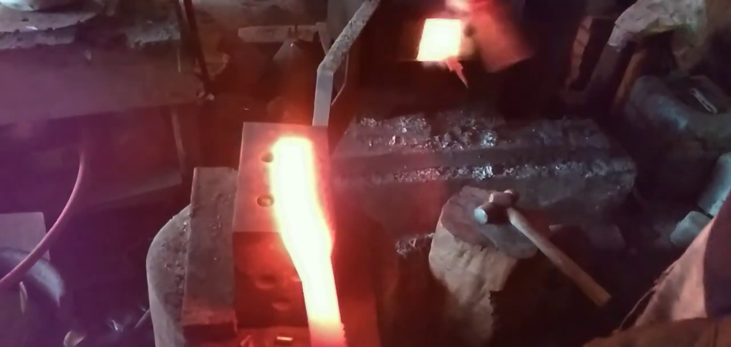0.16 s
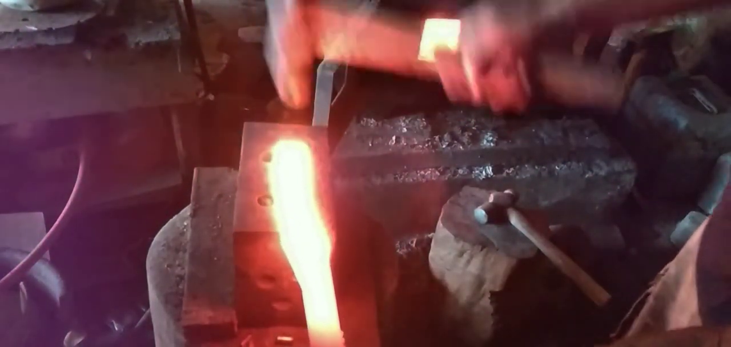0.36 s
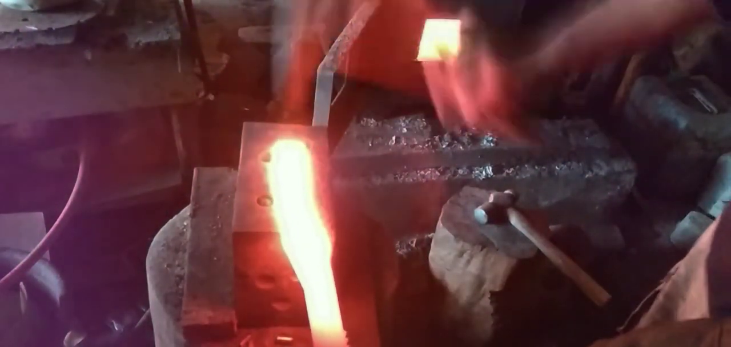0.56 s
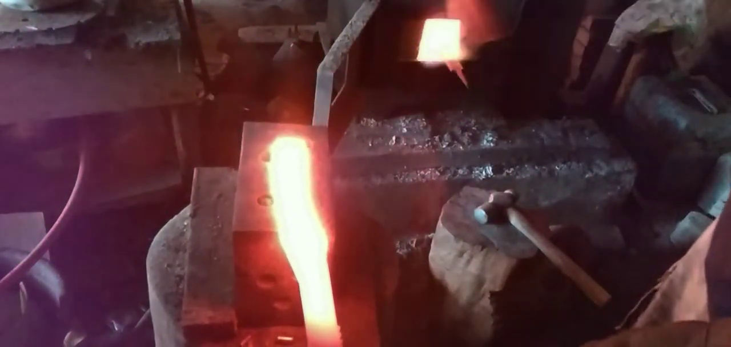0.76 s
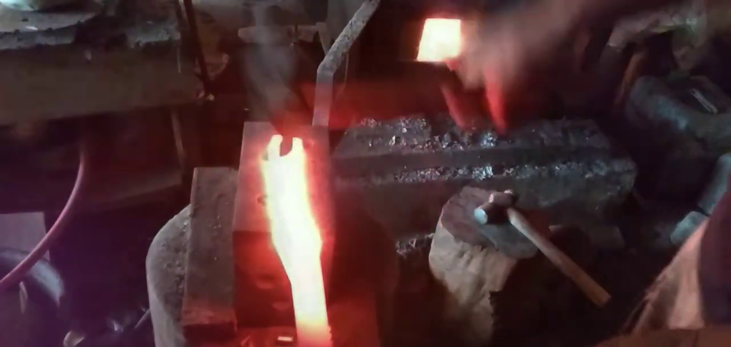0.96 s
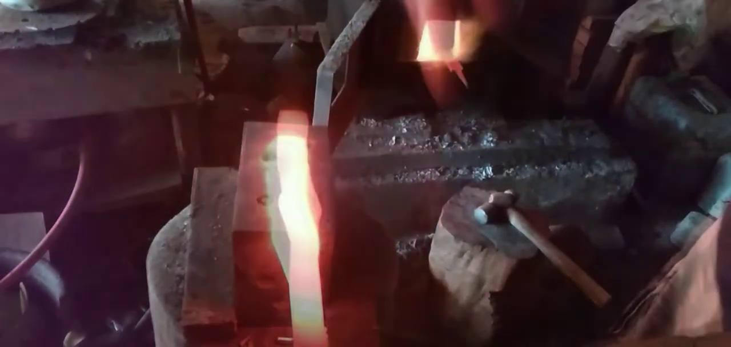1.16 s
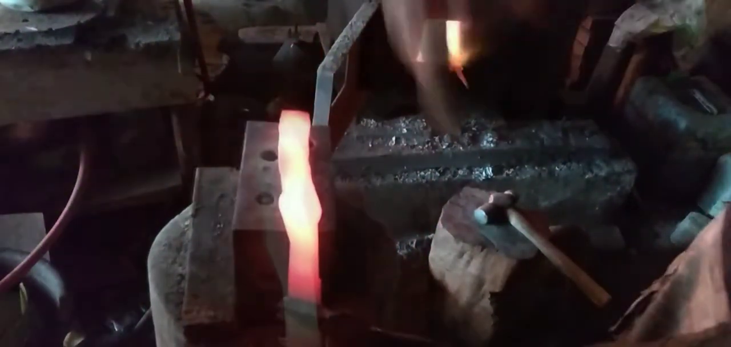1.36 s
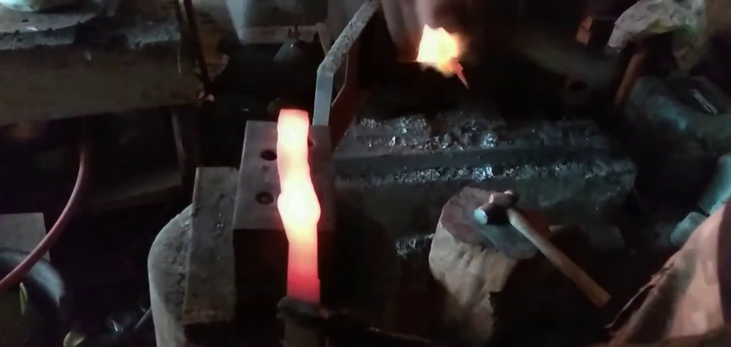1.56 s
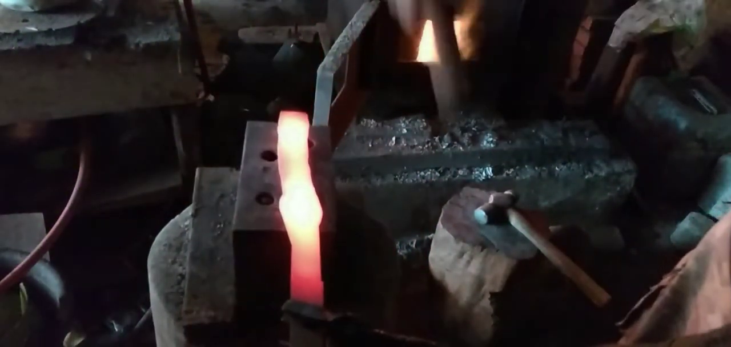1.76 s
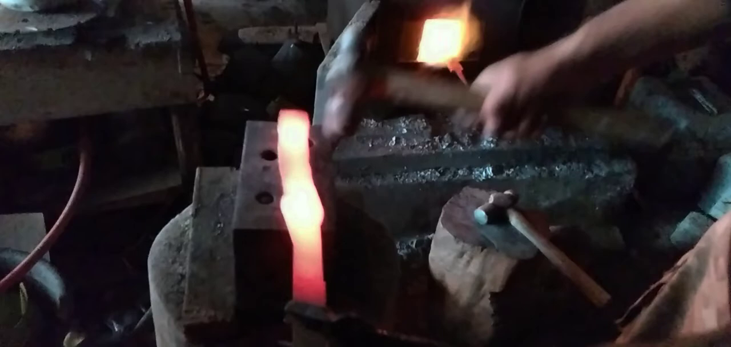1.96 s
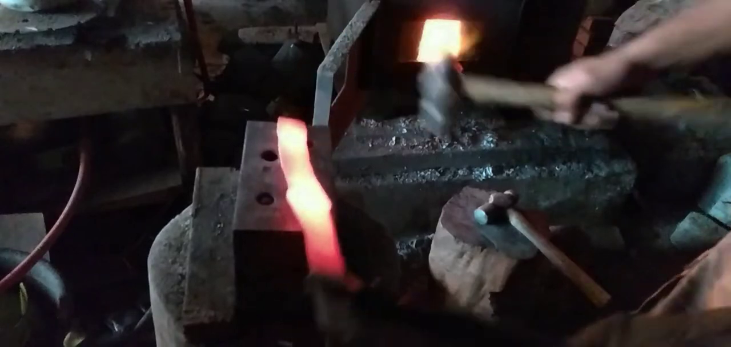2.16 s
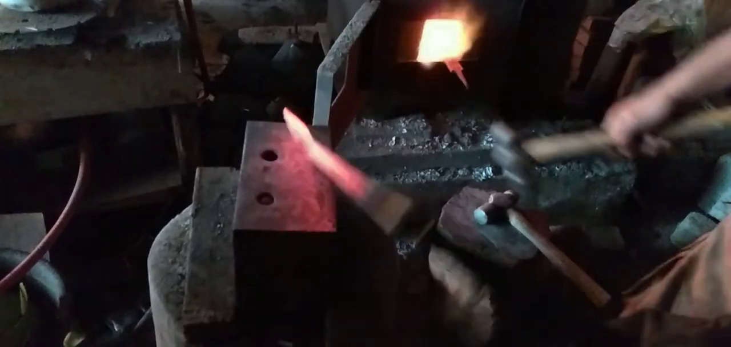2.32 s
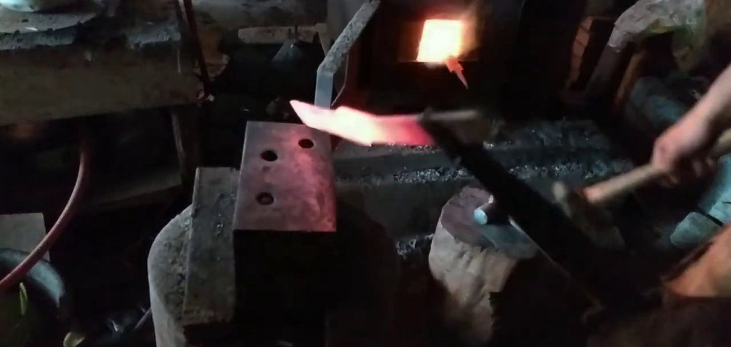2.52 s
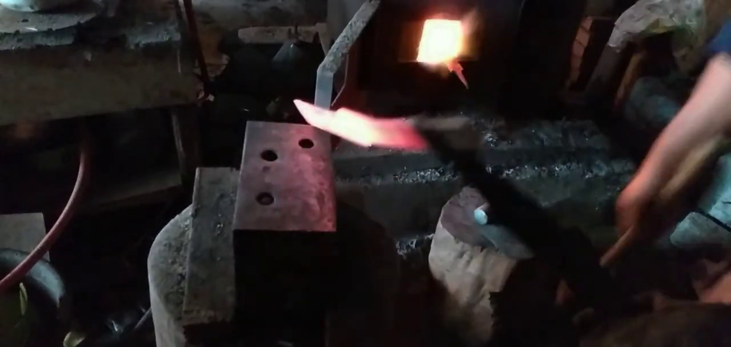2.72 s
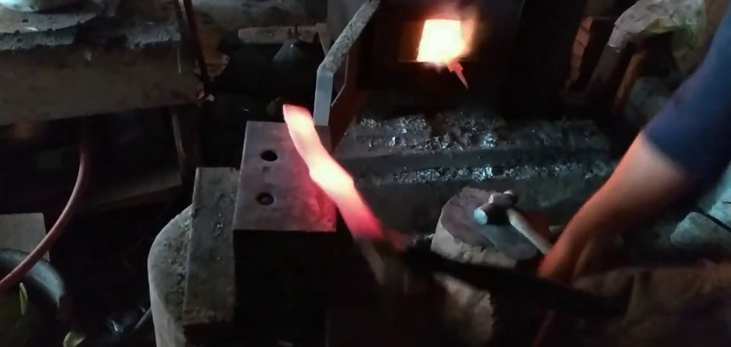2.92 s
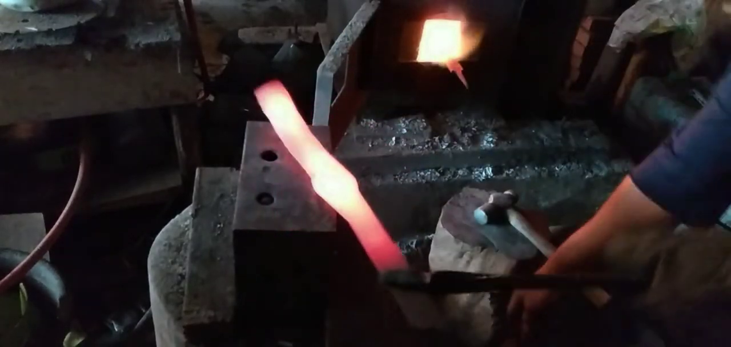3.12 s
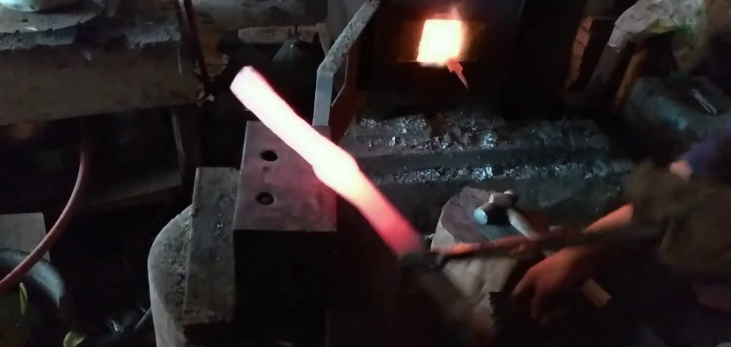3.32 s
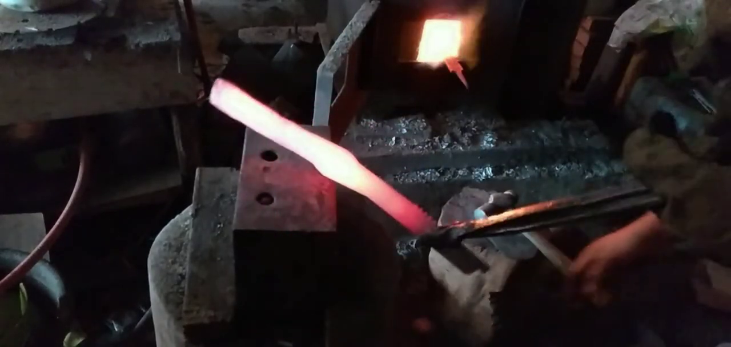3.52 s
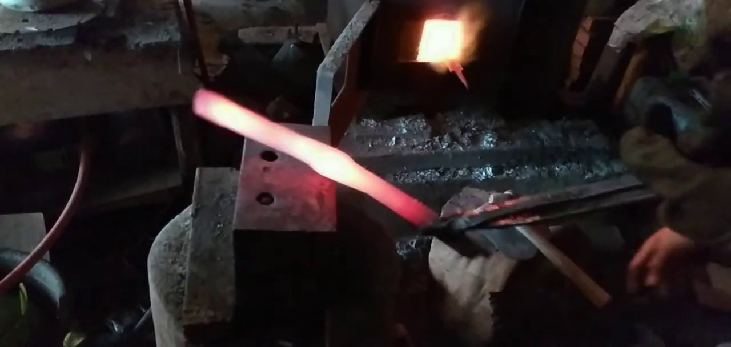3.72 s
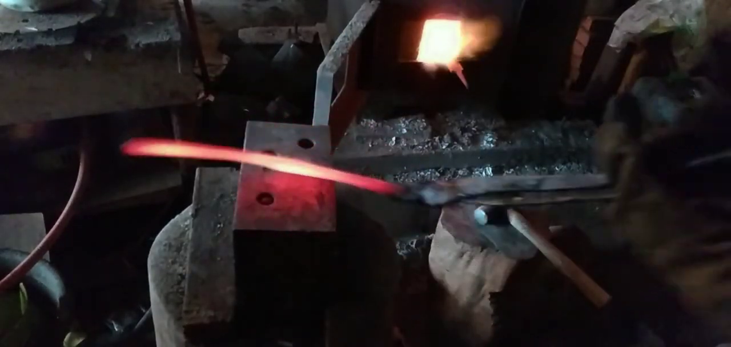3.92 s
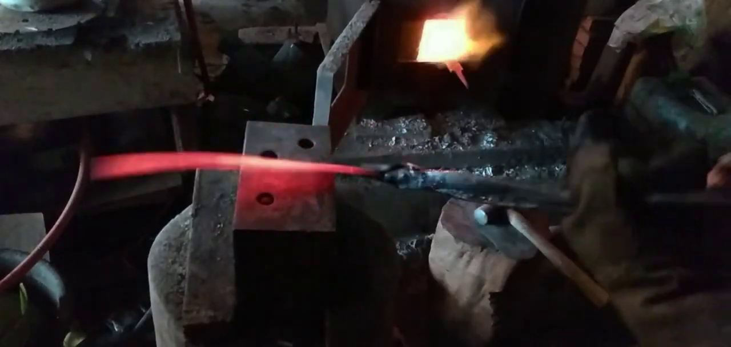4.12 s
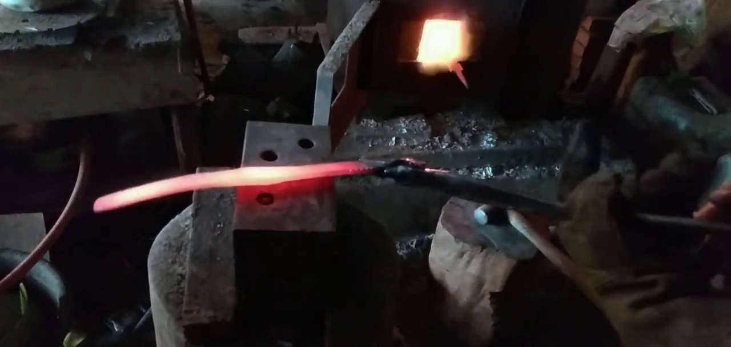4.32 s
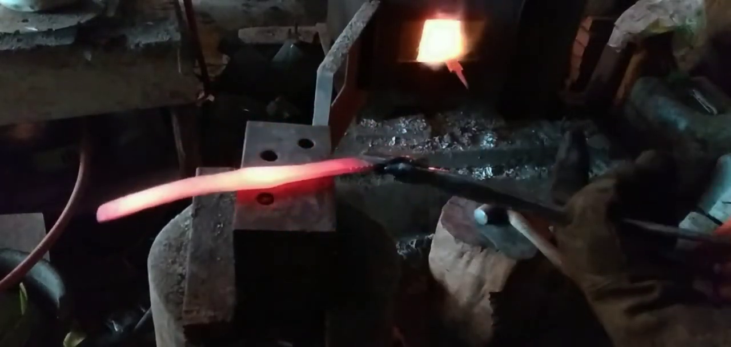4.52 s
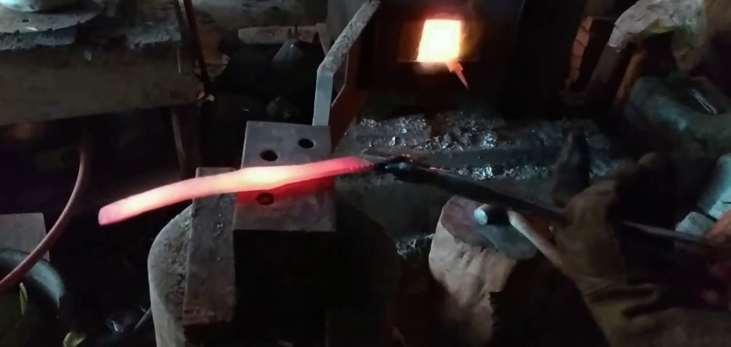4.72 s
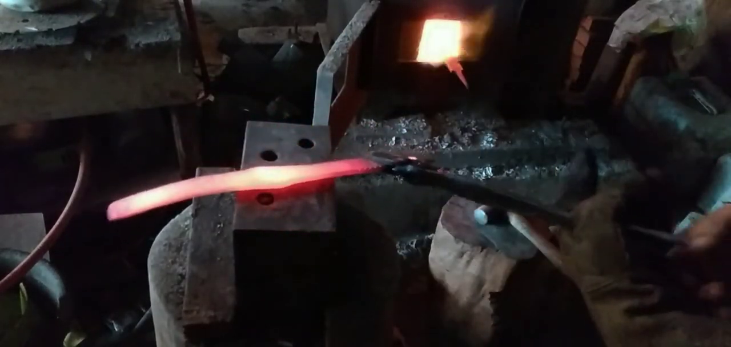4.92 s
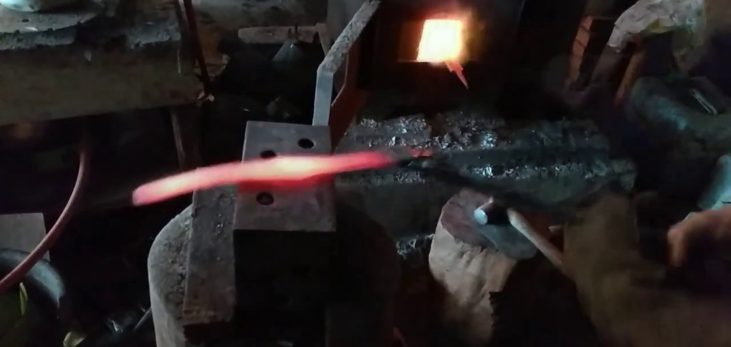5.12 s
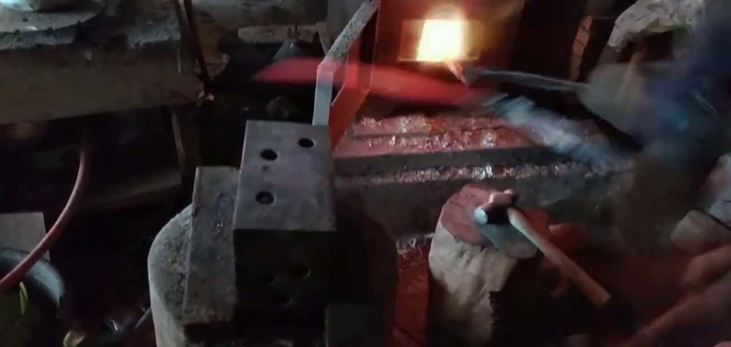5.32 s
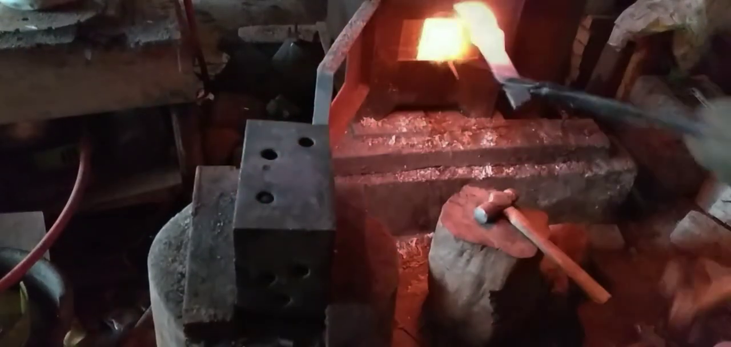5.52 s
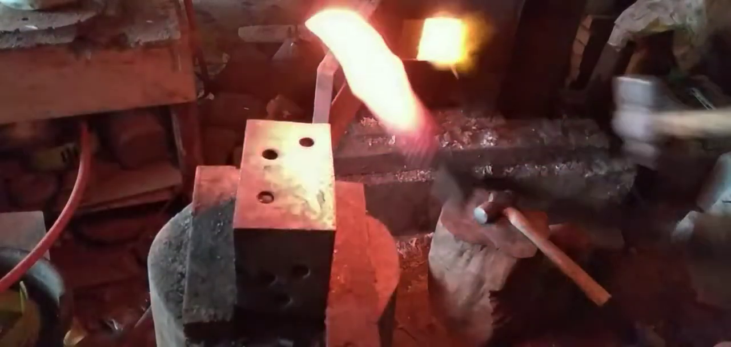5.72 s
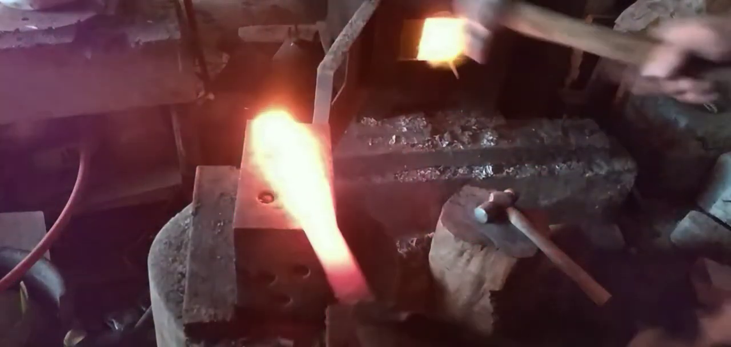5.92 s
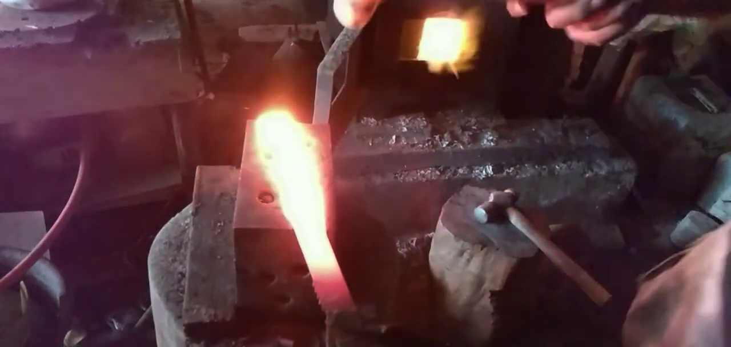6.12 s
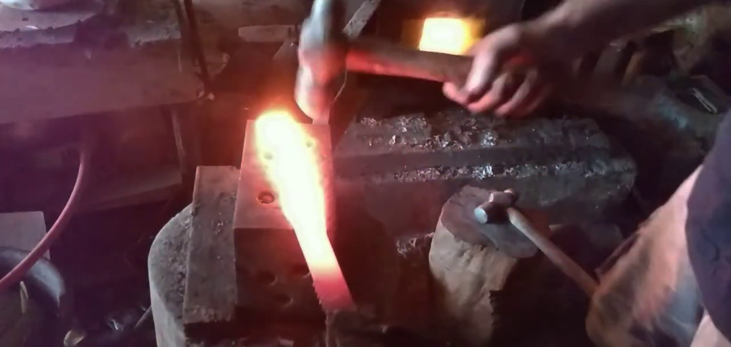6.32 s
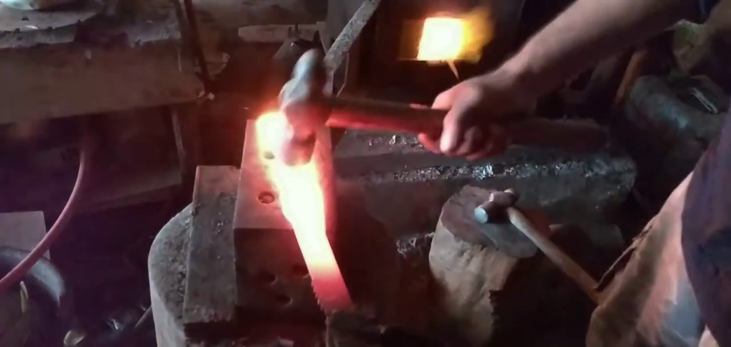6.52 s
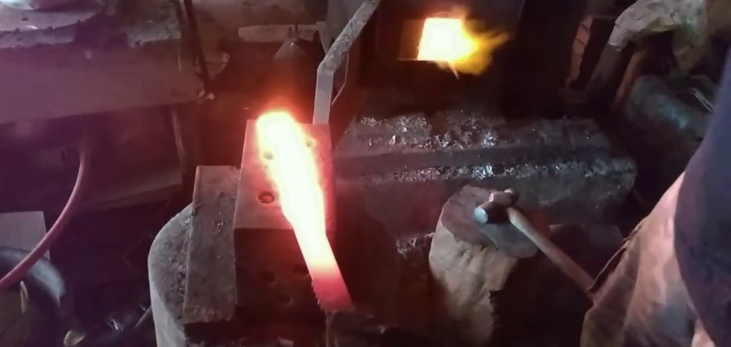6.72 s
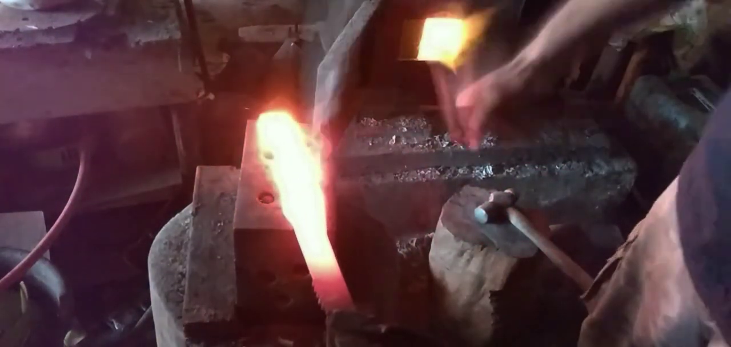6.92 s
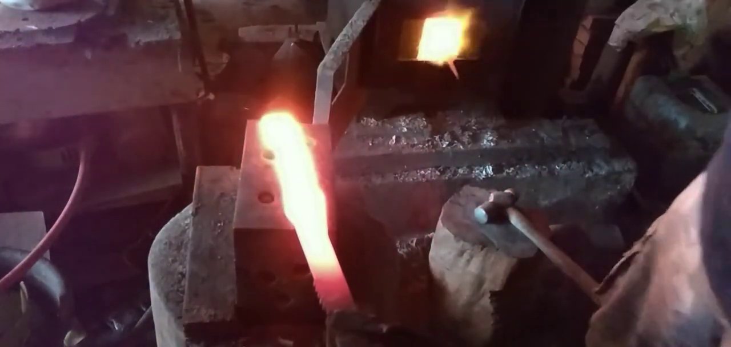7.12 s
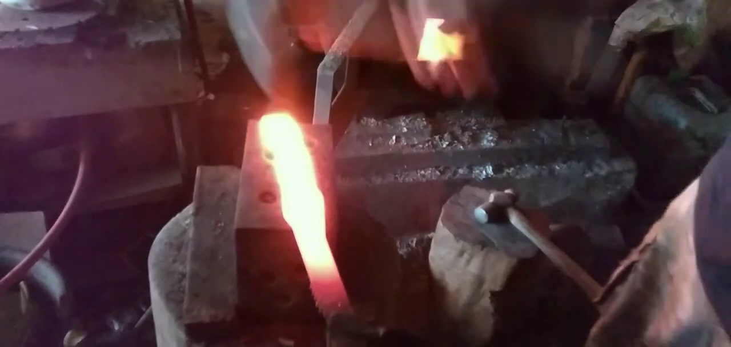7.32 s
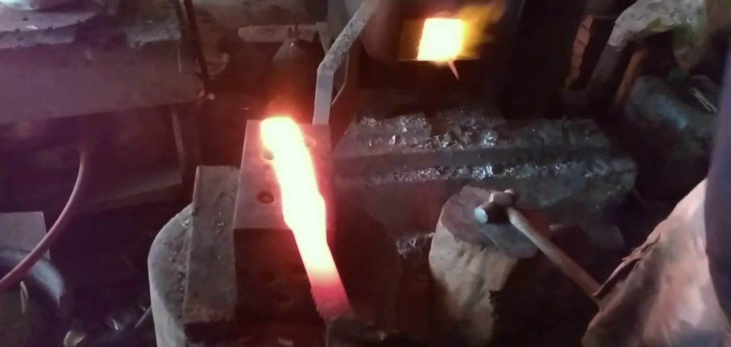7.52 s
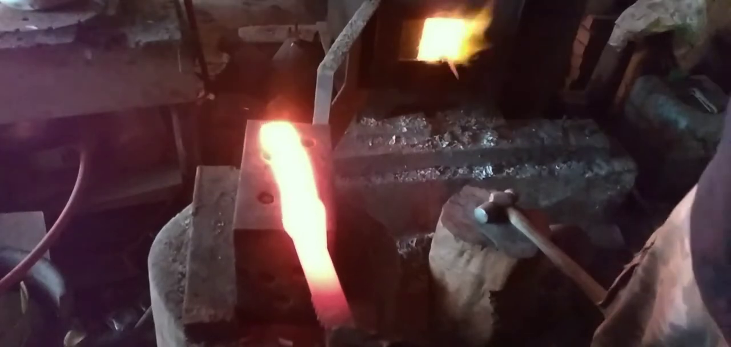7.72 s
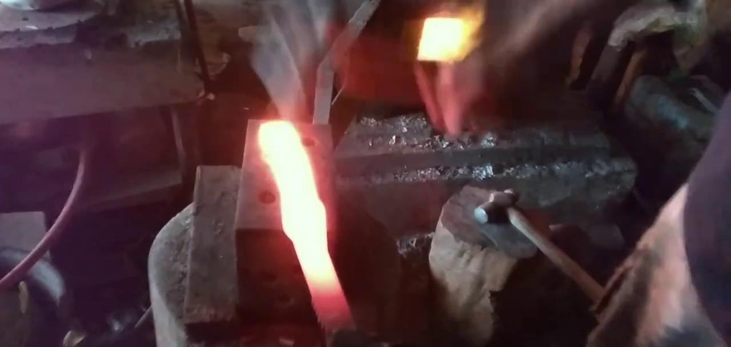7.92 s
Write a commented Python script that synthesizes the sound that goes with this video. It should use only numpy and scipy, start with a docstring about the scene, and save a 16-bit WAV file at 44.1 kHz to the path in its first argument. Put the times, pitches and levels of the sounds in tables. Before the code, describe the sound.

In a small cluttered workshop, a hammer strikes hot steel on an anvil about three times a second. Each blow is a hard, bright, short clang with a low thump, distorting the close microphones. Around two seconds it stops; tongs clink and scrape faintly over the forge's low roar and hiss. A sharp dead tap then leads into another run of blows.

```python
"""A smith hammers a red-hot bar on an anvil: a run of blows, a pause to turn the bar with tongs, then a second run.
Each blow is shaped noise for the clang and fading sine tones for the ringing steel, with a low thump under it
as the close microphones overload; peaks beyond full scale are cut flat.
The small workshop answers with a brief noise tail.
Behind it all the forge drones, whines and hisses as filtered noise; a few faint chirps are narrow noise."""
import sys
import numpy as np
from scipy import signal
from scipy.fft import rfft, irfft, next_fast_len
from scipy.io import wavfile
from scipy.ndimage import map_coordinates

SR = 44100
rng = np.random.default_rng(int(sys.argv[2]) if len(sys.argv) > 2 else 0)


def store_wav(level_fs):
    """Save 16-bit WAV to argv[1]."""
    pcm = np.round(np.clip(np.atleast_2d(level_fs), -1, 1) * 32767)
    wavfile.write(sys.argv[1], SR, pcm.T.astype(np.int16))


N = 355446  # samples, about 8 s

# hammer contacts; the weak ones just after a blow are the hammer dropping back.
# Where it lands decides which modes ring:
# [t/s, clang level/dB, rise/s, chatter/s, t60/s, crack against clang/dB, brightness/(dB per octave),
#  ring level/dB of each family: ping, face, edge, heel, bar low, bar high]
BLOWS = [(-0.095, 9, .001, 0.006, 0.13, 3.5, -6, -16, -7.5, -32, -28, -18, -18),
         (0.2148, -17, 0.00016, .001, 0.22, 20.5, -2.1, -35, -15, -27, -29, -19, -10),
         (0.5240, -6.5, 0.00012, 0.0057, 0.11, 6.5, 0.2, -24, -18, -25, -40, -38, -5.5),
         (0.8265, -10.5, 0.0028, 0.01, 0.16, 6, -.6, -22, -15, -38, -31, -5, -20),
         (0.9125, -25, .00015, .003, 0.33, 9.5, -1.5, -33, -28, -31, -38, -29, -20),
         (1.145, -17, 0.011, 0.022, 0.18, 10, -1.1, -14.5, -13.5, -42, -20, -16, -12),
         (1.341, -10, 0.0004, 0.0028, 0.29, 0, -0.4, -16, -30, -26, -32, -23, -18),
         (1.464, -22.5, 0.00036, 0.0053, 0.13, 12.5, -1.2, -16, -19, -30, -30, -41, -19),
         (1.7599, -9, 0.00012, 0.0041, 0.25, 5, -0.6, -15.5, -10, -18, -25, -7.5, -8),
         (6.8631, -4.5, 0.000097, 0.0067, 0.13, -8, 0.9, -14, -24, -23, -36, -14, -22),
         (7.1904, -7, 0.00097, 0.011, 0.17, 9.5, -1, -20, -10.5, -32, -14, -5, -8),
         (7.5257, -9.5, 0.0017, 0.02, 0.11, 3, -0.9, -9.5, -28, -15.5, -24, -18, -2.5),
         (7.582, -20, 0.0026, 0.0059, 0.057, 14, 3.5, -47, -43, -44, -44, -39, -36),
         (7.827, -8, 0.019, 0.027, 0.14, 8, -0.5, -12, -20, -10.5, -10, -6, -23)]
# colour of steel striking steel: [f/Hz, relative level/dB per Hz]
CLANG_COLOUR = [(60, -4), (400, -10), (900, -12), (2000, -8.5), (3100, -10), (4100, -6.5), (5000, -8),
                (6100, -2), (6800, 1), (8000, -3), (10500, 1.5), (12500, -2), (14000, -5.5), (14800, -2.5),
                (15500, -18)]
# where the clang sits between the microphones: [f/Hz, left minus right/dB]
CLANG_BALANCE = [(1000, 0.5), (3000, -0.5), (6300, 4.5), (7500, 14), (8700, -10), (10200, -13),
                 (12000, -10), (15000, -1)]


def amp(db):
    """Decibels to gain."""
    return 10 ** (np.asarray(db) / 20)


def unit(x):
    """Scale x to an rms of 1."""
    return x / np.sqrt(np.mean(x ** 2) + 1e-20)


def along(points, hz):
    """Read a table of (f/Hz, value) at any frequency, on a log axis."""
    f, value = np.transpose(points)
    return np.interp(np.log(hz + 1), np.log(f + 1), value)


def curve(rows):
    """Turn a table of (t/s, value) into one value per sample."""
    return np.interp(np.arange(N) / SR, *np.transpose(rows))


def wobble(rate, size):
    """A smooth random curve through `rate` random points a second."""
    knots = rng.standard_normal(int(size * rate / SR) + 4)
    return map_coordinates(knots, [np.arange(size) * rate / SR])


def filtered(x, response):
    """Multiply the spectrum of x by a response that depends on frequency."""
    size = x.shape[-1]
    padded = next_fast_len(size + 8192)
    hz = np.fft.rfftfreq(padded, 1 / SR)
    return irfft(rfft(x, padded) * response(hz), padded)[..., :size]


def panned(pan_db):
    """Left and right gains of constant power; positive is louder on the left."""
    gains = amp(np.array([np.atleast_1d(pan_db), -np.atleast_1d(pan_db)]) / 2)
    return gains / np.sqrt(np.mean(gains ** 2, axis=0))


def noise(colour, alike, pan, size):
    """Stereo noise of rms 1: shared (mid) and opposite (side) noise, mixed for likeness, then balanced."""
    def mid_side(hz):
        turn = np.arccos(np.clip(along(alike, hz), -1, 1)) / 2
        return colour(hz) * [np.cos(turn), np.sin(turn)]

    mid, side = filtered(rng.standard_normal((2, size)), mid_side)
    left_right = np.array([mid + side, mid - side])
    return unit(filtered(left_right, lambda hz: panned(along(pan, hz))))


def add(track, s, sound):
    """Mix a sound into the track at s seconds; one begun before zero leaves only its tail."""
    start = round(s * SR)
    sound = sound[..., max(-start, 0):]
    part = track[:, max(start, 0):][:, :sound.shape[-1]]
    part += sound[..., :part.shape[-1]]


def forge():
    """Turbulent flame drives the flue's resonances over a rumble; the blower whines and the air jet hisses."""
    # resonances of the forge and its flue: [f/Hz, width/Hz (about the full width at half power), level/dB]
    resonances = [(87.2, 8, -3.5), (95.4, 7.1, -7), (127, 8.9, -10.5), (139, 4.5, -11.5), (170, 29.6, -1),
                  (184.6, 9.5, 0), (229.4, 17, -10), (259.4, 16.8, -3), (323.6, 9.2, -3), (369.8, 35, -1),
                  (402, 88, -4.5), (412, 21.6, 0.5), (463.6, 13.6, 0), (589, 64, -16), (728, 20, -20),
                  (874, 47, -22.5), (1152, 17, -24.5)]
    # colour of the broad rumble: [f/Hz, relative level/dB per Hz]
    rumble_colour = [(20, -5.5), (45, 2.5), (70, 3), (130, 4.5), (180, 4.5), (212, -12.5), (245, -6),
                     (300, -1.5), (520, -2.5), (700, -15), (1000, -17), (1700, -22.5), (2200, -21.5),
                     (4000, -38), (9000, -59)]
    # colour of the hissing air jet: [f/Hz, relative level/dB per Hz]
    jet_colour = [(3000, -27), (6000, -11.5), (8400, -5), (9100, -2), (9700, 1), (10500, 2), (12000, 0.5),
                  (13500, -7.5), (15800, -8)]
    # colour of the blower's airflow and its two faint whines: [f/Hz, relative level/dB per Hz]
    blower_colour = [(1500, -18), (2600, -2), (3050, -2.5), (3270, 4), (3500, -3.5), (4300, -2),
                     (5400, 0.5), (6600, 2.5), (7700, 2), (7950, 3), (8130, 9.5), (8400, -2), (10000, -10),
                     (15800, -7.5)]
    # level of the roar, before its small wobble: [t/s, level/dB]
    roar_level = [(0.0, -25.5), (.45, -24), (1.15, -28), (1.55, -25), (2.05, -24.5), (2.6, -24.5),
                  (2.8, -25.5), (3, -23.5), (3.7, -24.5), (4.25, -23.5), (4.8, -24.5), (5.15, -28),
                  (5.85, -26), (6.05, -25), (6.3, -25), (6.5, -24.5), (6.75, -26), (7.1, -24.5),
                  (7.7, -24.5), (8.06, -24.5)]
    # level of the hiss, before its flutter: [t/s, level/dB]
    hiss_level = [(0, -44), (.45, -45.5), (.7, -41), (.8, -47), (1.3, -45), (1.6, -41.5), (2.05, -43.5),
                  (2.25, -40.5), (2.5, -44.5), (2.65, -43), (2.8, -44.5), (3.4, -44), (3.75, -45.5),
                  (4.05, -41.5), (4.25, -46.5), (4.4, -43.5), (4.85, -40.5), (5.15, -48), (5.6, -47.5),
                  (6.25, -44.5), (6.7, -47.5), (7.1, -45), (7.4, -46), (8.06, -46)]
    # left-right likeness: [f/Hz, likeness, 1 for identical and 0 for unrelated]
    alike = [(60, 0.96), (130, 1), (290, 0.86), (640, 1), (1410, 0.044), (3100, 0.31), (6820, 0.13),
             (15000, 0.089)]
    # left-right balance: [f/Hz, left minus right/dB]
    balance = [(60, -4), (99, 1), (160, 0), (270, 1), (450, -3.5), (740, 4), (1220, -0.5), (2010, 0),
               (3330, 0), (5500, 8), (9080, -7.5), (15000, -13.5)]
    lag_s = 0.0002  # the forge reaches the right microphone first

    def flue(hz):
        power = 0
        for fc, width, db in resonances:
            power = power + amp(2 * db) / (1 + ((hz - fc) / (0.72 * width)) ** 2) ** 2
        return np.sqrt(power)

    drone = amp(0.5) * noise(flue, alike, balance, N)
    rumble = amp(-8.0) * noise(lambda hz: amp(along(rumble_colour, hz)), alike, balance, N)
    jet = noise(lambda hz: amp(along(jet_colour, hz)), alike, balance, N)
    blower = amp(-24.5) * noise(lambda hz: amp(along(blower_colour, hz)), alike, balance, N)
    roar = amp(curve(roar_level) + 0.45 * wobble(9, N)) * (drone + rumble + blower)
    flutter_db = 0.8 * wobble(14, N) + 0.5 * wobble(5, N)
    hiss = amp(curve(hiss_level) + flutter_db) * jet
    # half the lag delays the left, the other half advances the right
    shift = np.array([[-1], [1]])
    return filtered(roar + hiss, lambda hz: np.exp(1j * np.pi * hz * lag_s * shift))


def workshop(x):
    """The cluttered room answers with a brief noise tail; the lows die first and the middle lasts longest."""
    # how long the room answers: [f/Hz, t60/s]
    room_t60 = [(200, 0.066), (2000, 0.28), (7000, 0.25), (14000, 0.16)]
    hz, t, bins = signal.stft(rng.standard_normal((2, SR // 2)), SR, nperseg=256)
    fading = bins * amp(-60 * t / along(room_t60, hz)[:, None])
    tail = signal.istft(fading, SR, nperseg=256)[1]
    tail = tail * np.minimum(np.arange(tail.shape[1]) / SR / 0.002, 1)  # 2 ms fade-in
    return signal.fftconvolve(x, tail / np.linalg.norm(tail[0]), axes=1)[:, :N]


def chirps():
    """Short bursts of narrow-band noise whose level breaks up at random."""
    # faint high chirps, perhaps small birds outside:
    # [t/s, length/s, f/Hz, level/dB before the fade in and out, half width/Hz at half amplitude]
    calls = [(1.857, 0.086, 4500, -44, 600), (1.89, 0.1, 3600, -45, 500), (1.898, .1, 6000, -41.5, 550),
             (6.738, .075, 6380, -47.5, 150), (6.787, 0.046, 5400, -48, 450),
             (6.977, 0.067, 3600, -47, 170), (7.136, .06, 6220, -47, 200), (7.35, .08, 5070, -50.5, 350),
             (7.436, .06, 6300, -48.5, 250), (7.443, .08, 5100, -48.5, 400), (7.742, 0.097, 4600, -52, 400)]
    break_db, break_rate = 3.5, 160  # depth, random points a second
    out = np.zeros((2, N))
    for s, length, pitch, db, width in calls:
        size = round(length * SR)
        breaks = unit(amp(break_db * wobble(break_rate, size)))
        swell = np.hanning(size) ** 0.5 * breaks
        band = lambda hz: 1 / (1 + ((hz - pitch) / width) ** 2)
        add(out, s, amp(db) * swell * unit(filtered(rng.standard_normal((2, size)), band)))
    return out


def clang(tilt_db, size, uneven=1):
    """Dense, unpitched noise of steel on steel; harder contact is brighter, and random ripples colour each."""
    # left-right likeness: [f/Hz, likeness, 1 for identical and 0 for unrelated]
    alike = [(200, 0.19), (700, 0.18), (2000, 0), (12000, 0.0079)]
    ripple_db, ripple_step_hz = 2.4, 130  # depth (at uneven=1) and spacing of random peaks and valleys
    knots = rng.standard_normal(1024)

    def colour(hz):
        ripple = uneven * ripple_db * map_coordinates(knots, [hz / ripple_step_hz])
        octaves = np.log2(np.maximum(hz, 1000) / 1000)  # the tilt acts above 1 kHz only
        return amp(along(CLANG_COLOUR, hz) + ripple + tilt_db * octaves)

    return noise(colour, alike, CLANG_BALANCE, size)


def tongs():
    """Clang noise makes small clinks and scrapes as the bar is gripped and turned, and dead taps later."""
    # light touches and scrapes of tongs and bar: [t/s, level/dB, rise/s, t60/s, brightness/(dB per octave)]
    touches = [(1.86, -35, 0.043, 0.46, -2), (2.891, -31, 0.0018, 0.098, -1.5),
               (3.029, -30, 0.00083, 0.12, -7.5), (3.09, -40, 0.054, 0.57, -3.5),
               (3.169, -47, .015, .15, -1), (4.064, -37.5, 0.0022, 0.17, -3), (4.102, -32, .001, 0.062, 4),
               (4.16, -38.5, 0.022, 0.25, -8.5), (5.242, -41, .003, 0.12, -6.5)]
    # dead taps as bar and hammer are set in place:
    # [t/s, level/dB, t60/s, brightness/(dB per octave), boost at the clink of the anvil face/dB]
    taps = [(5.8170, -17, 0.026, 2.5, 10.5), (5.843, -27.5, 0.05, 1, 2), (6.4247, -1.5, 0.031, 3.6, -2)]
    rough_db, slip_rate = 3.5, 300  # sliding steel catches and slips: depth, random points a second
    clink_hz, clink_width_hz = 6340, 820  # the face rings only dully under the bar
    out = np.zeros((2, N))
    t = np.arange(SR // 3) / SR
    for s, db, rise, t60, tilt_db in touches:
        stroke = np.minimum(t / rise, 1) * amp(db - 60 * np.maximum(t - rise, 0) / t60)
        slips = unit(amp(rough_db * wobble(slip_rate, len(t))))
        add(out, s, stroke * slips * clang(tilt_db, len(t), uneven=0))
    for s, db, t60, tilt_db, clink_db in taps:
        clink = lambda hz: amp(clink_db / (1 + ((hz - clink_hz) / clink_width_hz) ** 2))
        tap = unit(filtered(clang(tilt_db, len(t), uneven=0.5), clink))
        add(out, s, amp(db - 60 * t / t60) * tap)
    return out


def low_thump():
    """A low thump under each blow as the microphones overload: one slow swing and its return, unequal in stereo."""
    thump_peak = 0.42  # full scale, for a 0 dB clang before panning
    thump_per_db = 0.6  # dB the thump loses per dB of clang
    out = np.zeros((2, N))
    u = np.arange(SR // 3) / SR / 0.029  # the swing changes sign at u = 2, 58 ms
    swing = u * (1 - u / 2) * np.exp(-1.4 * u)
    for s, db, *_ in BLOWS:
        thump = thump_peak * amp(thump_per_db * db) * rng.choice([-1, 1])
        add(out, s, thump * swing / swing.max() * panned(4 + 5 * rng.standard_normal()))
    return out


def overtones(low_hz, high_hz, t60, count):
    """The crowd of weak modes of hammer head, tongs and anvil, coloured like the clang."""
    pitches = low_hz + (high_hz - low_hz) * (np.arange(count) + rng.random(count)) / count
    return [(hz, along(CLANG_COLOUR, hz), t60, along(CLANG_BALANCE, hz), "crowd") for hz in pitches]


def ring(modes, t, family_db, scatter_db, blur, flutter_db):
    """Fading sines, as strong as their family was struck; shifting contact blurs phase and makes them flutter."""
    hold_s = 0.022  # the ring keeps its strength while the hammer bears on the steel
    out = np.zeros((2, len(t)))
    paths = np.array([[0], [np.pi / 2]])  # the two microphones hear each mode out of step
    free = np.maximum(t - hold_s, 0)
    slow = t[::32]  # random curves are drawn at every 32nd sample, so their rates are times 32
    for hz, db, t60, pan_db, family in modes:
        drift = np.interp(t, slow, wobble(150 * 32, len(slow)))
        flutter = np.interp(t, slow, wobble(45 * 32, len(slow)))
        phase = 2 * np.pi * (hz * t + rng.random()) + paths + blur * drift
        level_db = db + family_db[family] + scatter_db * rng.standard_normal() + flutter_db * flutter
        out += panned(pan_db) * amp(level_db - 60 * free / t60) * np.sin(phase)
    return out


def crunch(t, rise, count):
    """Envelope of the flakes of scale that crack at scattered moments under the hammer."""
    spread_s, t60 = 0.013, 0.0085  # mean scatter in time, life of one crack (s)
    starts = rise / 2 + spread_s * rng.exponential(size=(count, 1))
    age = t - starts
    size_db = 3 * rng.standard_normal((count, 1)) - 5 * starts / spread_s  # later cracks tend to be weaker
    cracks = (age >= 0) * amp(size_db - 60 * np.abs(age) / t60)
    return np.sqrt(np.sum(cracks ** 2, axis=0))


def fading_clang(tilt_db, t):
    """A clang that starts dense and crossfades to one with deeper valleys, as some bands outlast others."""
    thinning_s, depth = 0.04, 1.6  # time this takes, how much deeper the valleys get
    dense = np.exp(-(t / thinning_s) ** 2)
    early = np.sqrt(dense) * clang(tilt_db, len(t))
    late = np.sqrt(1 - dense) * clang(tilt_db, len(t), uneven=depth)
    return early + late


def strike(db, rise, chatter, t60, crack_db, tilt_db, *ring_db):
    """One contact: the bar chatters between hammer and anvil, then both ring out."""
    # steel modes of the anvil: [f/Hz, level/dB added to its family's, t60/s, left minus right/dB, family]
    anvil_modes = [(6690, -1, .235, 3, "ping"), (11346, 2, .16, -10, "face"), (8904, 1, .17, -1, "edge"),
                   (10346, 3, .15, -12, "edge"), (12126, -11, .15, -8, "heel"),
                   (12262, 0, .17, -10, "heel"), (12472, -2, .16, -8, "heel"),
                   (12751, -14, .14, -6, "heel")]
    # steel modes of the bar: [f/Hz, level/dB added to its family's, t60/s, left minus right/dB, family]
    bar_modes = [(6900, -15, .12, 5, "bar low"), (7325, -1.5, .1, 6, "bar low"),
                 (4050, -17, .05, 2, "bar high"), (4380, -19, .045, 2, "bar high"),
                 (8780, -5, .09, -2, "bar high"), (14570, -14, .06, -6, "bar high"),
                 (14680, -14, .06, -6, "bar high")]
    # names of the mode families, in the order of the ring levels of a blow
    families = ("ping", "face", "edge", "heel", "bar low", "bar high")
    crack_t60 = 0.021  # s, the first contact
    crunch_db, crunch_tilt_db = 1, -3  # against the clang: level, dB per octave
    shimmer_db = -25  # the crowd of weak modes against the clang
    ring_swell_s = 0.007  # time constant of the anvil's swelling ring
    t = np.arange(SR // 3) / SR
    onset = np.minimum(t / max(rise, 1 / SR), 1)
    # first contact cracks, the scale crunches, then the bar rattles unevenly as it settles
    crack = amp(db + crack_db - 60 * t / crack_t60) * clang(tilt_db - 1.0, len(t))
    scale = amp(db + crunch_db) * crunch(t, rise, count=9) * clang(tilt_db + crunch_tilt_db, len(t))
    fade_db = -60 * np.maximum(t - chatter, 0) / t60
    rattle_db = 2.2 * wobble(600, len(t))
    body = amp(db + fade_db + rattle_db) * fading_clang(tilt_db, t)
    # the anvil rings clearly; the hot bar, pinched under the hammer, rings blurred
    family_db = dict(zip(families, ring_db))
    crowd = overtones(low_hz=900, high_hz=13000, t60=0.14, count=80)
    anvil = ring(anvil_modes, t, family_db, scatter_db=0.7, blur=0.22, flutter_db=1.8)
    shimmer = ring(crowd, t, {"crowd": db + shimmer_db}, scatter_db=3.5, blur=0.6, flutter_db=2)
    bar = ring(bar_modes, t, family_db, scatter_db=1.5, blur=1, flutter_db=2.5)
    swelling_anvil = (1 - np.exp(-t / ring_swell_s)) * anvil
    return onset * (crack + scale + body + swelling_anvil + shimmer + bar)


def hammer():
    """Two runs of blows, each a strike of steel on steel; now and then the hammer drops back."""
    steel = np.zeros((2, N))
    for s, *blow in BLOWS:
        add(steel, s, strike(*blow))
    return steel


def scene():
    """Anvil close by and forge behind it; the room answers the hammer, tongs and chirps."""
    work = hammer() + tongs() + chirps()
    room = amp(-14) * workshop(work)
    return work + room + low_thump() + forge()


def record(dry):
    """Peaks beyond full scale are cut flat; then the treble is faded out up to the band limit."""
    top_hz, edge_hz = 15950, 350  # nothing is kept above top_hz; the fade below it is edge_hz wide
    clipped = np.clip(dry, -1, 1)
    return filtered(clipped, lambda hz: np.clip((top_hz - hz) / edge_hz, 0, 1))


dry = scene()
out = record(dry)
store_wav(out)
```